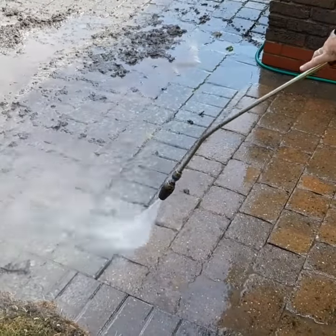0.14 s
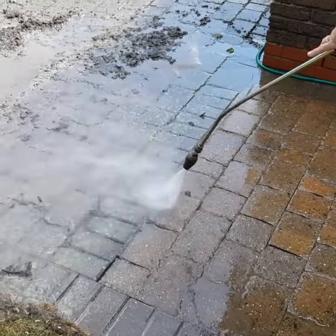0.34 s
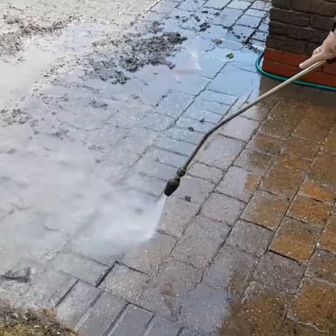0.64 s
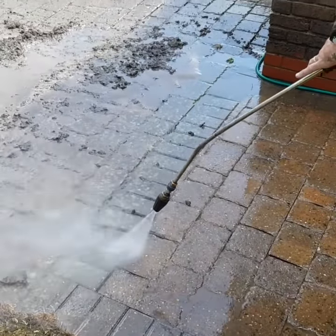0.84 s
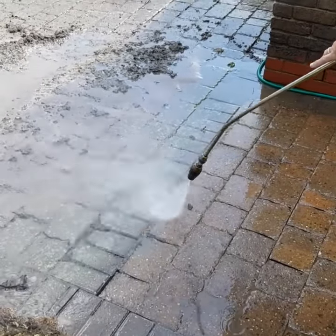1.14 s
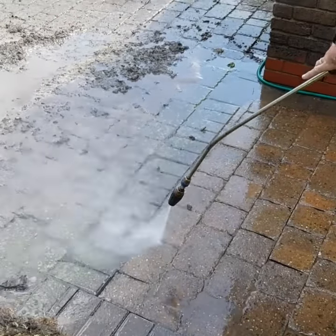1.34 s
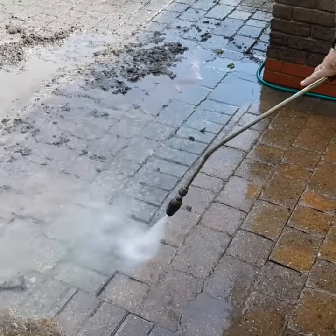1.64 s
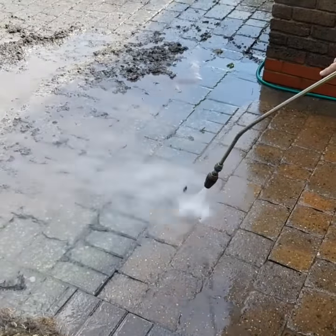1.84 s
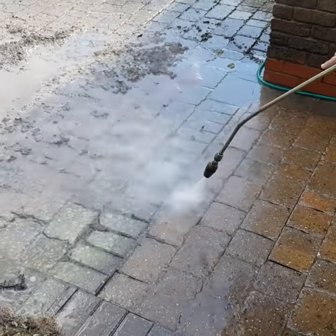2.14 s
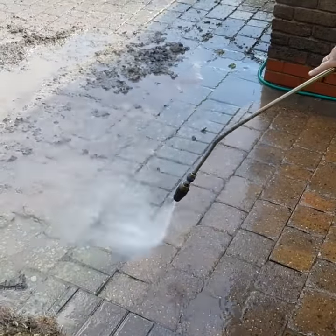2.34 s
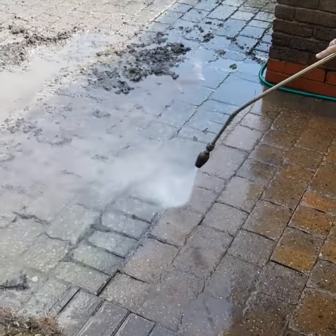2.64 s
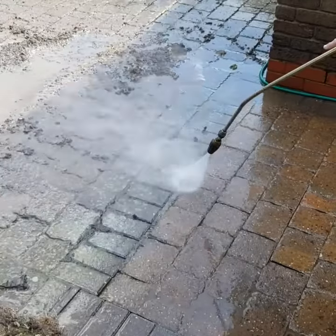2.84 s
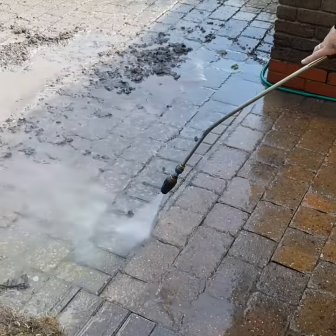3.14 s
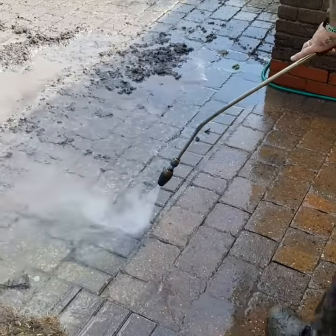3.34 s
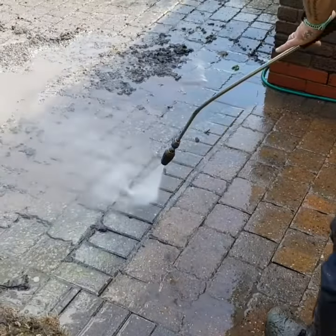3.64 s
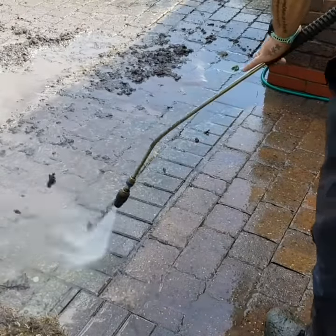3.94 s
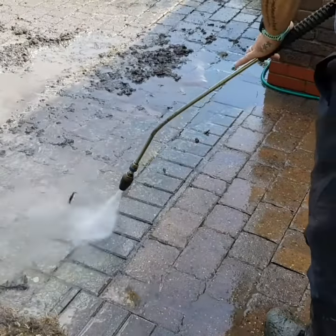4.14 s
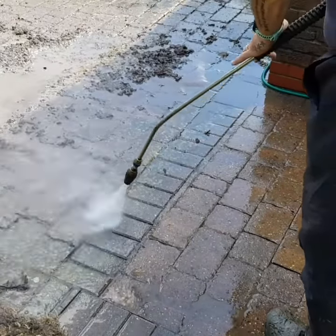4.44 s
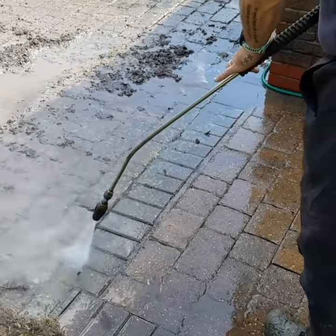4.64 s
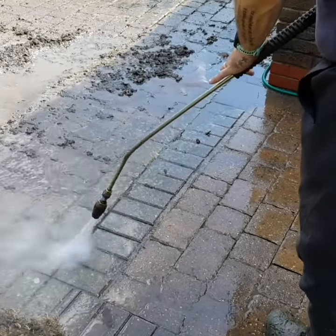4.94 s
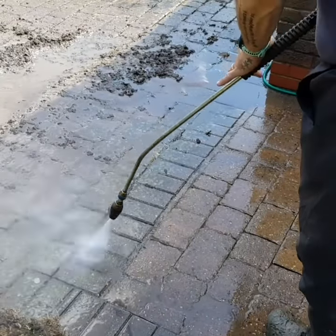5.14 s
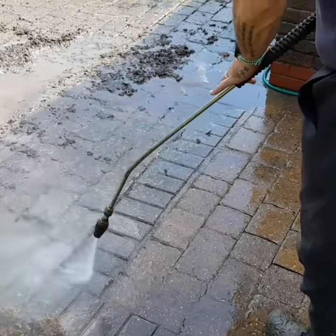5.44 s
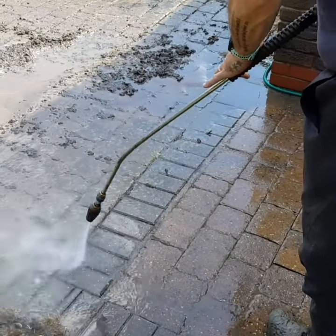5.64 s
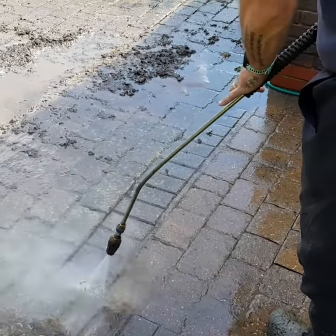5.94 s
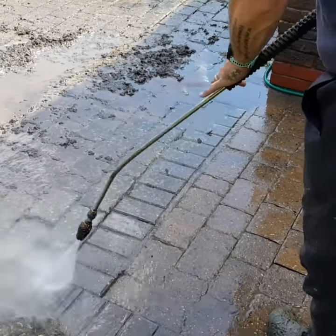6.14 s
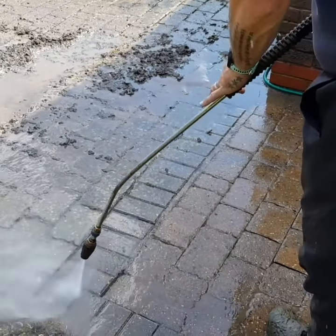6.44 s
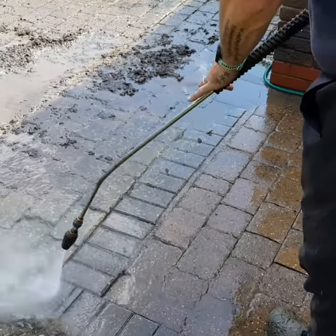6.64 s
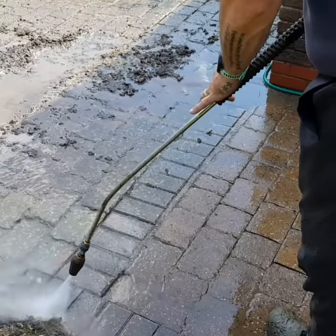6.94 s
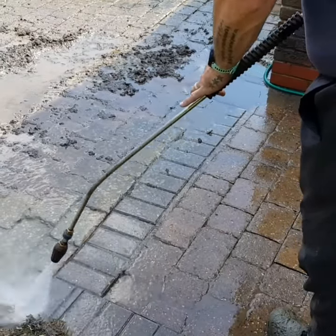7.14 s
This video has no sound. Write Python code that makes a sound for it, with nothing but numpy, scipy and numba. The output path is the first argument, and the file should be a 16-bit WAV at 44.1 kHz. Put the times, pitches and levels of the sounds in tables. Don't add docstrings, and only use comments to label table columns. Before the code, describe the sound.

Outdoors, close up, a pressure washer with a rotating nozzle sprays wet brick paving without a break. The harsh, bright hiss carries a very fast throb and a low buzzing hum. Rapid knocks on brick joints give it a gritty rattle, rising and dipping as the lance sweeps. A pump drones faintly further off. A phone a couple of metres away hears it in stereo, with small shifts between sides.

```python
import sys
import numpy as np
from scipy import signal
from scipy.fft import rfft, irfft, next_fast_len
from scipy.io import wavfile
from scipy.ndimage import uniform_filter1d
from numba import njit

SR = 44100
rng = np.random.default_rng(int(sys.argv[2]) if len(sys.argv) > 2 else 0)


def file_out(sig):
    cols = np.atleast_2d(sig).T
    lim = np.clip(cols, -1, 1)
    pcm = np.round(lim * 32767).astype(np.int16)
    wavfile.write(sys.argv[1], SR, pcm)


def decibels_to_gain(level_db):
    exponent = np.asarray(level_db, float) / 20
    return 10 ** exponent


N = 322047
SIZE = next_fast_len(N)
HZ = np.arange(SIZE // 2 + 1) * SR / SIZE + 1e-3

# (time [s], turn rate [Hz], hum level [dB], octave level [dB])
TURN = [(0.0, 178.7, -57, -49), (0.02, 182.8, -50, -45), (0.12, 180, -40.5, -44), (0.67, 180.6, -45, -47.5),
        (1.02, 179.5, -39.5, -42.5), (1.22, 180.8, -41, -44), (1.95, 180.8, -40, -41.5),
        (2.01, 180.7, -48.5, -44.5), (3.07, 179.9, -38, -45.5), (3.72, 180, -44, -44.5),
        (3.76, 180.9, -41, -53), (4.09, 179.7, -41.5, -43.5), (5.29, 180.1, -40, -49),
        (5.39, 181.3, -43, -41), (5.88, 181.8, -39, -50.5), (6.0, 181.4, -40.5, -41.5),
        (7.08, 180.1, -40, -46.5), (7.3, 180.8, -46, -42.5)]
# (time [s], strike level [dB], spray strength [dB])
JET = [(0, -30.5, 0.5), (.4, -31.5, 0.5), (.9, -29.5, 1.5), (1.1, -29.5, 1.5), (1.4, -30.5, 3),
       (1.75, -31, 2.3), (2.3, -31.5, 1.5), (2.75, -30.5, 3), (3.3, -30, 2), (3.55, -29.5, 0.7),
       (4.0, -31, 2.6), (4.2, -28.5, 2.1), (4.75, -28, 3), (5.35, -29.5, 3), (5.65, -32, 2), (6.4, -29, 2),
       (6.85, -32, 1.5), (7.3, -30.5, 0.3)]
# (frequency [Hz], left level [dB per Hz], right level [dB per Hz])
PORTS = [(320, -67.5, -68), (436, -69.5, -74), (840, -62.5, -66), (1550, -61.5, -62), (2000, -62.5, -57.5),
         (2560, -60, -57.5), (3020, -61, -59), (3900, -58, -58.5), (5400, -56.5, -57.5), (5480, -63, -56.5),
         (7300, -55.5, -63.5), (8100, -50.5, -56.5), (10700, -52.5, -53.5), (13100, -52.5, -49),
         (15800, -50.5, -59.5)]
STRIKE_MEAN_DB = -30
LEAD_MEAN_US = -30
ATTACK_S, RELEASE_S = .016, .045


def unit(x):
    return x / np.sqrt(np.mean(x ** 2))


def in_time(table):
    s, *columns = np.transpose(table)
    return [np.interp(np.arange(N) / SR, s, c) for c in columns]


def in_pitch(table, hz):
    f, *columns = np.transpose(table)
    return [np.interp(np.log(hz), np.log(f), c) for c in columns]


def shape(x, gain):
    return irfft(rfft(x, SIZE) * gain, SIZE)[..., :N]


def walk(rate):
    hold = int(SR / rate)
    steps = np.repeat(rng.standard_normal(N // hold + 1), hold)
    return unit(uniform_filter1d(uniform_filter1d(steps, hold), hold)[:N])


def swell(table, release_s=RELEASE_S):
    t = np.arange(N) / SR
    start, length = np.transpose(table)[:2, :, None]
    rise = (t - start) / ATTACK_S + 1
    fall = 1 - (t - start - length) / release_s
    return np.clip(np.minimum(rise, fall), 0, 1)


@njit
def ring(x, hz, width):
    y, b, l = np.empty(len(x)), 0., 0.
    for i in range(len(x)):
        g, k = np.tan(np.pi * hz[i] / SR), width / hz[i]
        v = (b + g * (x[i] - l)) / (1 + g * (g + k))
        b, l, y[i] = 2 * v - b, l + 2 * g * v, k * v
    return y


@njit
def delay(x, lag):
    y = np.zeros(len(x))
    for i in range(24, len(x) - 24):
        at = i - lag[i] + 1e-6
        wave = np.sin(np.pi * (at - int(at))) / np.pi
        for j in range(int(at) - 11, int(at) + 13):
            wave = -wave
            y[i] += x[j] * wave / (at - j) * (1 - ((at - j) / 12.5) ** 2) ** 2
    return y


def patches(x, table, gain, width_hz, release_s=RELEASE_S):
    out = np.zeros(N)
    for over, (s, length, hz, _), g, width in zip(swell(table, release_s), table, gain, width_hz):
        on = slice(max(int((s - .05) * SR), 0), int((s + length + .06) * SR))
        band = ring(x[on], np.full(len(x[on]), 1. * hz), 1. * width)
        out[on] += g * over[on] * band
    return out


def tint(x, table, share):
    hz, gain = np.transpose(table)[2:]
    return x + patches(x, table, gain, share * hz)


def pump():
    # (frequency [Hz], level [dB])
    lines_table = [(48.4, -52), (96.6, -65.5), (136.3, -60.5), (72.4, -64.5)]
    # (frequency [Hz], level [dB per Hz])
    rumble_table = [(20, -9), (45, -11), (90, -7.5), (160, -5), (280, -3.5), (420, -6)]
    t = np.arange(N) / SR
    lines = 0
    for hz, db in lines_table:
        level = np.sqrt(2) * decibels_to_gain(db + 0.81 * walk(16))
        lines = lines + level * np.cos(2 * np.pi * hz * t + 0.26 * walk(2.14))
    low = decibels_to_gain(in_pitch(rumble_table, HZ)[0]) / (1 + (HZ / 500) ** 4)
    mid, side = shape(rng.standard_normal((2, N)), low)
    rumble = unit(mid) + 0.5 * unit(side) * np.array([[1], [-1]])
    rumble_db = -48 + np.array([[.8], [-.8]])
    return lines + decibels_to_gain(rumble_db) * rumble


def wall(x):
    # (start [s], length [s], frequency [Hz], extra gain [ratio])
    returns = [
        (1.16, 2.5, 6340, 0.32),
        (6.402, .9, 6140, -0.14),
    ]
    return tint(x, returns, 0.18)


def pools(x):
    # (start [s], length [s], frequency [Hz], extra gain [ratio])
    wet_spots = [(0.247, .06, 3000, .5), (.55, 0.25, 1550, 0.18), (1.4, 0.32, 1550, 0.27),
                 (2.05, .05, 2600, -.4), (2.15, 0.22, 4300, -.2), (2.33, .04, 2600, -0.34),
                 (2.49, 0.044, 2600, -.4), (2.85, .3, 1510, 0.31), (2.9, .25, 2870, 0.34),
                 (4.05, 1.2, 870, 0.26), (4.2, 2.2, 4095, -0.091), (5.4, 0.34, 800, 0.51),
                 (5.85, 0.33, 750, 0.2), (6.157, .05, 1300, 0.43), (6.193, .03, 1900, 0.029),
                 (6.236, 0.07, 2390, 0.68), (6.256, 0.064, 1590, .4), (6.333, 0.033, 2200, .6),
                 (6.402, .2, 1692, 0.33), (6.704, 0.44, 1500, -0.031)]
    return tint(x, wet_spots, 0.31)


def paving(x):
    # (time [s], first [Hz], its depth [0-1], second [Hz], its depth [0-1])
    echo = [(0, 3400, .5, 6700, .3), (.9, 3350, .75, 6500, .2), (3.6, 3300, .75, 6400, .3),
            (4.2, 3200, .55, 6050, .22), (6.3, 3000, .45, 5950, .25), (6.7, 2800, .7, 6200, .35),
            (7.3, 2850, .7, 6600, .35)]
    first_hz, first, second_hz, second = in_time(echo)
    depth = np.clip(first - .1 + .24 * walk(11), 0, .9)
    x = x - depth * ring(x, first_hz + 150 * walk(7), 560.)
    depth = np.clip(second + .17 * walk(6), 0, .9)
    return x - depth * ring(x, second_hz + 200 * walk(6), 800.)


def swing():
    # (time [s], extra lead of the left port [us])
    turning_points = [(0, -50), (.25, -34), (.62, -75), (.99, -37), (1.44, -74), (1.76, -45), (2.24, -97),
                      (2.7, -53), (3.06, -89), (3.55, -31), (3.82, -48), (4.3, -5), (4.6, -22), (5.08, 22),
                      (5.5, -10), (5.84, 13), (6.17, -8), (6.6, 18)]
    late_s = np.maximum(np.arange(N) / SR - turning_points[-1][0], 0)
    lead_us = in_time(turning_points)[0] + 3 * late_s
    return uniform_filter1d(lead_us, int(.14 * SR))


def rim(x):
    notches_hz, hz_per_us = (11900, 14800), 19
    lead_us = swing()
    depth = .42 * np.clip((5 - lead_us) / 40, 0, 1)
    slide_hz = hz_per_us * np.minimum(lead_us + 45, 30)
    for hz in notches_hz:
        x = x - depth * ring(x, hz + slide_hz, 1200.)
    return x + .5 * depth * ring(x, np.full(N, np.mean(notches_hz)), 6000.)


def shadow(x, k, half_lag):
    hz, width_hz, sway = ((10350, 900., 1.5), (10100, 1900., -.35))[k]
    shade = .36 * (1 + sway * (half_lag - half_lag.mean())) + 0.16 * walk(6.1)
    return x - np.clip(shade, 0, .85) * ring(x, hz + 90 * walk(3), width_hz)


def drop_centre(ports):
    # (start [s], length [s], frequency [Hz], width [Hz])
    dropouts = [(.38, 0.019, 6600, 500), (.97, .04, 3600, 400), (1.42, .14, 3200, 350),
                (2.1, .04, 3250, 350), (2.25, .1, 3270, 350), (3.0, .02, 3150, 350.5),
                (3.97, .08, 6600, 700), (4.13, .16, 6003, 700), (4.05, .015, 3650, 500),
                (4.28, .03, 3600, 700), (4.39, .04, 6054, 800), (4.57, .04, 6150, 1500),
                (4.675, .05, 6100, 1600), (4.79, .1, 5950, 900), (4.88, 0.11, 3950, 700),
                (5.04, .02, 5920, 500), (5.15, 0.059, 3920, 400), (5.25, .02, 3550, 400),
                (5.42, .01, 5950, 400.3), (5.5, .18, 6230, 1000), (5.6, .08, 3700, 600),
                (5.64, .03, 4295, 600), (5.63, 0.032, 5500, 600), (5.7, .07, 5540, 500),
                (5.765, .03, 3880, 900), (5.84, .07, 5750, 350), (5.86, 0.038, 4247, 400),
                (6.045, 0.19, 6160, 800), (6.14, .08, 5600, 800), (6.3, .06, 6000, 600),
                (6.34, 0.056, 4305, 400), (6.6, 0.18, 4260, 900), (6.6, 0.085, 2760, 300),
                (6.66, .02, 6116, 500), (7.04, .09, 2760, 350)]
    # (start [s], length [s], frequency [Hz], extra gain [ratio])
    far_swings = [
        (2.08, .34, 10700, -0.27),
        (2.88, .36, 10400, -.45),
    ]
    centre = ports.mean(axis=0)
    depth = np.full(len(dropouts), .85)
    lost = patches(centre, dropouts, depth, np.transpose(dropouts)[3], release_s=.014)
    return ports + tint(centre - lost, far_swings, 0.17) - centre


def strike():
    # (start [s], length [s], strength [dB], ring [Hz])
    joints = [(.27, 0.062, 4, 2120), (0.46, 0.03, 3, 2000), (0.572, 0.17, 0.5, 1770),
              (0.836, 0.066, 2, 1950), (1.198, 0.047, 1.5, 1990), (1.36, 0.066, 0.8, 1600),
              (1.756, 0.04, 5, 2134), (1.94, .04, 1.5, 1850), (2.043, 0.054, -3, 1602),
              (2.154, 0.029, 3.5, 1903), (2.248, 0.035, 2.5, 2023), (2.315, .05, -1.5, 2000),
              (2.48, 0.06, -2, 1803), (2.592, 0.22, 3, 1790), (3.115, 0.051, 2, 2150),
              (3.364, 0.042, 1.5, 1762), (3.468, 0.059, 0.5, 1540), (3.804, 0.067, 0.5, 1540),
              (4.074, 0.037, 0, 1180), (4.353, .04, -0.5, 1466), (4.567, 0.022, -2, 1420),
              (4.65, 0.042, 0.5, 1830), (4.956, 0.089, -1.2, 1420), (5.448, 0.046, -5.5, 1500),
              (5.633, 0.086, -2, 1630), (5.796, .17, 4, 1910), (6.062, 0.078, -3.5, 1500),
              (6.168, 0.036, 6, 1250), (6.246, 0.04, 3, 1790), (6.477, 0.091, 2, 1900)]
    flat_hz = 1875
    over, (db, hz) = swell(joints), np.transpose(joints)[2:]
    strike_db = in_time(JET)[0] + db @ over + 0.35 * walk(14)
    joint_hz = flat_hz + (hz - flat_hz) @ over + 70 * walk(12)
    share = .27 + .028 * (strike_db - STRIKE_MEAN_DB) + .1 * walk(4.24)
    return strike_db, np.clip(joint_hz, 800, 3000), np.clip(share, .05, .85)


def spray_strength(strike_db, share):
    # (spray strength [dB per dB], swing [dB per 100 us], strike [dB per dB])
    follow = [
        (1.0, 0, 0.23),
        (0.7, 0.8, -0.12),
        (0.95, 0.5, -0.05),
    ]
    harder_db = strike_db - STRIKE_MEAN_DB
    parts_db = [harder_db + 10 * np.log10((1 - share) / 0.78)]
    for by_spray, by_swing, by_strike in follow:
        part_db = by_spray * in_time(JET)[1] + by_swing * (swing() - LEAD_MEAN_US) / 100
        parts_db.append(part_db + by_strike * harder_db + .3 * walk(4.1))
    return np.array(parts_db)


def spray(angle, strike_db, share):
    part_hz = (1500, 4500, 9000, 13500)
    # (frequency [Hz], depth once a turn [dB], depth twice a turn [dB], place in the turn [rad])
    throb = [(500, 1.5, .6, 2.5), (1200, 2.8, 1.5, 2.8), (2200, 2.5, 1.2, 3.0), (4500, 1.5, .6, 2.8),
             (8000, 2.6, 1.1, 2.2), (13000, 2.8, 1.9, 1.1)]
    drops = rfft(rng.standard_normal((3, N)) * decibels_to_gain(2.0 * rng.standard_normal(N)), SIZE)
    strength = spray_strength(strike_db, share)
    gust, near, out = walk(28), walk(13), 0
    centres = np.geomspace(300, 16000, num=18)
    for k, hz in enumerate(centres):
        window = np.interp(np.log(HZ), np.log(centres), np.arange(len(centres)) == k)
        band = irfft(drops * window, SIZE)[:, :N]
        weight = [np.interp(np.log(hz), np.log(part_hz), row) for row in np.eye(len(part_hz))]
        once_db, twice_db, place = in_pitch(throb, hz)
        near = 0.68 * near + 0.94 * walk(15)
        lows = np.clip(2500 / hz, .38, 1)
        turn = angle + place + .5 * near
        patchy_db = 0.36 * gust + 1.03 * lows * near + 0.95 * lows * walk(25)
        throb_db = once_db * np.cos(turn) + twice_db * np.cos(2 * turn + 2.2)
        out = out + band * decibels_to_gain(weight @ strength + patchy_db + throb_db)
    left_db, right_db = in_pitch(PORTS, HZ)
    hollow = 1 - 0.33 * np.exp(-((HZ - 1520) / 200) ** 2)
    thin_bass = 1 / (1 + (260 / HZ) ** 4)
    level = decibels_to_gain((left_db + right_db) / 2 - 3.0) * np.sqrt(SR / 2)
    return shape(unit(out), level * hollow * thin_bass)


def hum(angle):
    # (start [s], length [s], depth [dB])
    hum_gaps = [(.55, .25, -2), (1.25, .35, -4.5), (1.995, 0.56, -5), (2.62, .1, -1), (2.78, 0.11, -9),
                (3.268, 0.061, -9), (3.66, 0.082, -2), (4.551, 0.16, -5), (6.121, 0.18, -5),
                (6.72, .06, -8), (7.169, .15, -10)]
    # (start [s], length [s], depth [dB])
    octave_gaps = [(.68, .05, -7), (1.2, .15, -3), (2.05, 0.12, -5.5), (2.793, .06, -1), (3.76, 0.027, -5),
                   (3.86, .06, -4), (4.33, 0.035, -2), (4.498, 0.11, -3), (4.95, 0.059, -4),
                   (6.23, 0.065, -6), (6.898, 0.042, -6)]
    _, hum_db, octave_db = in_time(TURN)
    hum_db = hum_db + np.transpose(hum_gaps)[2] @ swell(hum_gaps)
    hum_db = uniform_filter1d(hum_db, size=SR // 16)
    octave_db = octave_db + np.transpose(octave_gaps)[2] @ swell(octave_gaps)
    tone = decibels_to_gain(hum_db + 2.0 + 1.17 * walk(20)) * np.cos(angle + 0.12 * walk(13))
    tone = tone + decibels_to_gain(octave_db + 2.5 * walk(16) + 1.5) * np.cos(2 * angle + 0.64 * walk(13))
    tone = tone + decibels_to_gain(octave_db - 12 + 2.1 * walk(5.8)) * np.cos(3 * angle + .7 * walk(8.7))
    return np.sqrt(2) * tone


def blows(angle, scatter_db):
    turns = np.floor(angle / (2 * np.pi))
    at = np.flatnonzero(np.diff(turns) > 0)
    clicks = np.zeros(N)
    clicks[at] = decibels_to_gain(scatter_db * rng.standard_normal(N // 100)[:len(at)])
    return clicks


def knock(angle, strike_db, joint_hz, share):
    first = blows(angle + 0.16 * walk(60), scatter_db=3.0)
    second = blows(angle + 2.205 + 0.63 * walk(4) + 0.12 * walk(60), scatter_db=5.0)
    clicks = first + 0.34 * second
    rung = ring(ring(clicks, joint_hz, 500.0), joint_hz, 500.0)
    rung = rung + 1.1 * ring(clicks, joint_hz, 1440.0)
    rung = rung + 0.5 * ring(clicks, 0.49 * joint_hz, 930.0)
    rung = shape(rung, 1 / (1 + (580 / HZ) ** 10) / (1 + (HZ / 3000) ** 4))
    return unit(rung) * decibels_to_gain(strike_db + 1.0) * np.sqrt(share)


def scene():
    # (frequency [Hz], lead of the left [rad], likeness of the ports [0-1])
    bend = [(300, .1, .84), (900, .05, .72), (1900, 0, .74), (2300, 1.6, .4), (2700, 1.4, .5),
            (3300, 1.2, .3), (3600, 2.9, .5), (4300, 2.75, .48), (4800, 2.7, .42), (5400, 2.8, .52),
            (6200, 3.5, .54), (7500, 6.7, .42), (8700, 8.6, .62), (10500, 9.8, .5), (12500, 11, .62),
            (15500, 12.7, .42)]
    angle = 2 * np.pi * np.cumsum(in_time(TURN)[0] + 0.591 * walk(6)) / SR
    strike_db, joint_hz, share = strike()
    direct, *scattered = spray(angle, strike_db, share)
    left_db, right_db = in_pitch(PORTS, HZ)
    lead, alike = in_pitch(bend, HZ)
    alike = alike ** .8
    jet = hum(angle) + knock(angle, strike_db, joint_hz, share)
    direct = shape(direct, np.sqrt(alike)) + jet
    scattered = np.array([scattered[0] + 0.42 * np.roll(jet, 310), scattered[1] - 1.1 * np.roll(jet, 470)])

    lead_us = swing()
    half_lag = lead_us * SR / 2e6
    facing = np.clip(.3 * (half_lag - half_lag.mean()), -.08, .15)
    direct, scattered = direct * np.sqrt(1 + facing), scattered * np.sqrt(1 - facing)
    cavity_hz = 12750 - 4000 * facing + 120 * walk(2.1)
    settling_db = -2 * np.exp(-np.arange(N) / SR / 0.86)
    pan_db = settling_db - .9 * (lead_us - LEAD_MEAN_US) / 100
    out = pump()
    for k, side in enumerate((1, -1)):
        tilt = decibels_to_gain(side * (left_db - right_db) / 2)
        port = shape(delay(direct, -side * half_lag), tilt * np.exp(.5j * side * lead))
        port = port + shape(scattered[k], tilt * np.sqrt(1 - alike))
        heard = shadow(pools(paving(port)), k, half_lag)
        heard = wall(heard) if k else rim(heard)
        heard = heard * decibels_to_gain(side * pan_db / 2)
        cavity = (.1, .5)[k] * (1 - 7.4 * facing) * ring(heard, cavity_hz, 1400.0)
        out[k] += heard + cavity
    return drop_centre(out)


def band_limit(x):
    return signal.sosfilt(signal.butter(12, 17090, fs=SR, output="sos"), x)


def record(dry):
    rounded = .9 * dry / (.9 ** 6 + dry ** 6) ** (1 / 6)
    cut = shape(rounded, 1 / (1 + (HZ / 15740) ** 400))
    return band_limit(cut)


dry = scene()
out = record(dry)
file_out(out)
```